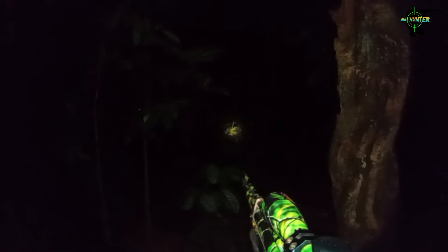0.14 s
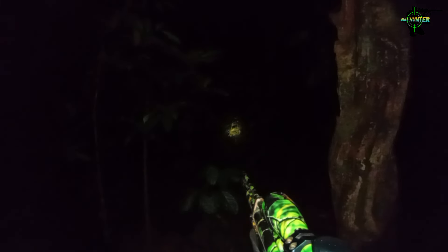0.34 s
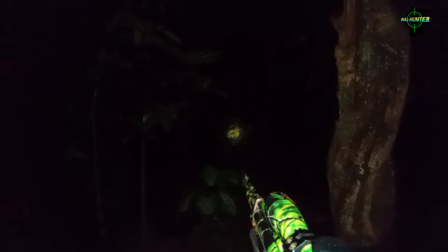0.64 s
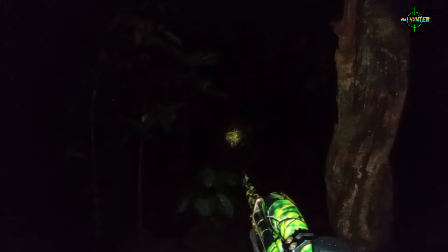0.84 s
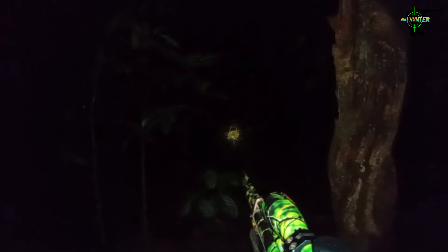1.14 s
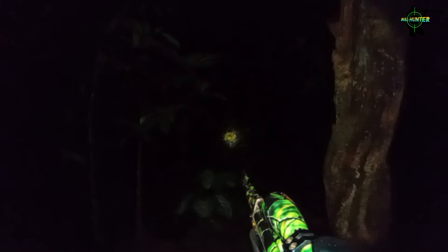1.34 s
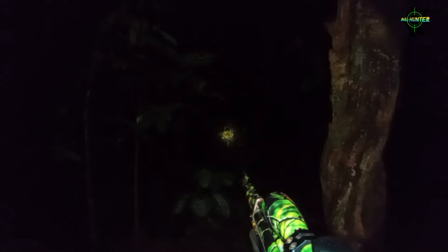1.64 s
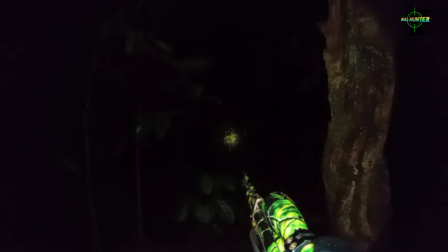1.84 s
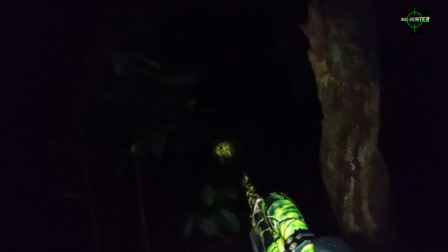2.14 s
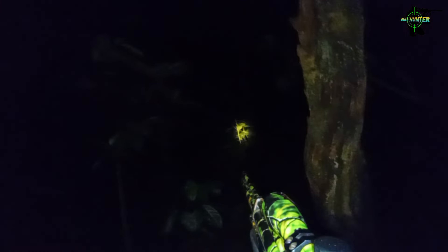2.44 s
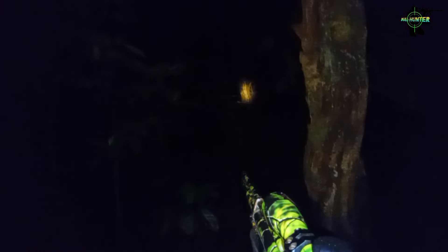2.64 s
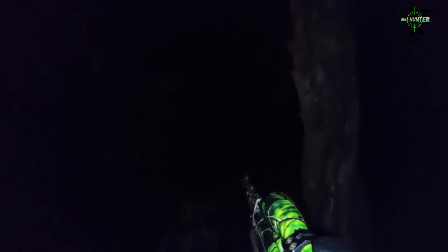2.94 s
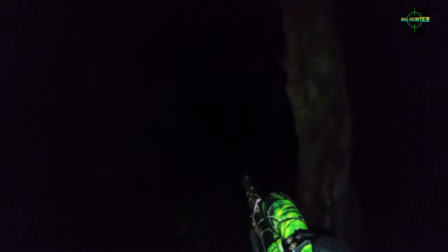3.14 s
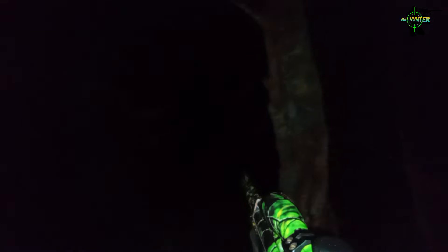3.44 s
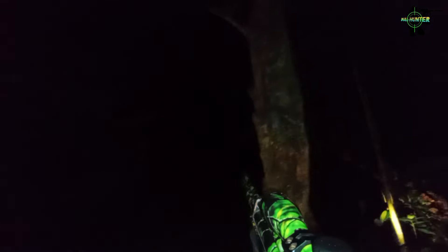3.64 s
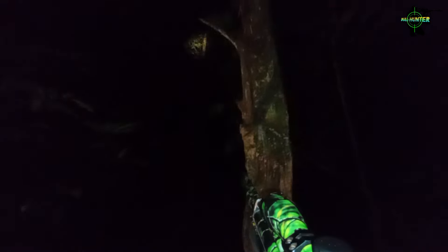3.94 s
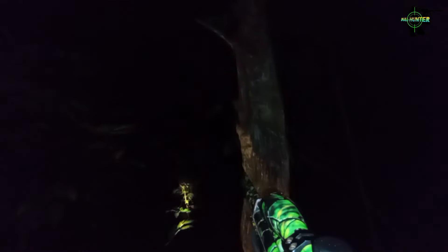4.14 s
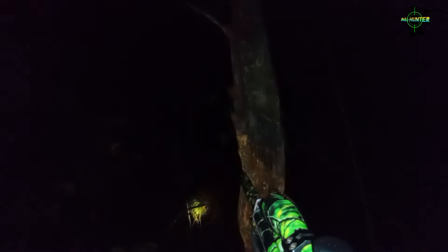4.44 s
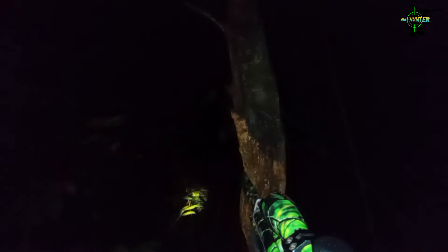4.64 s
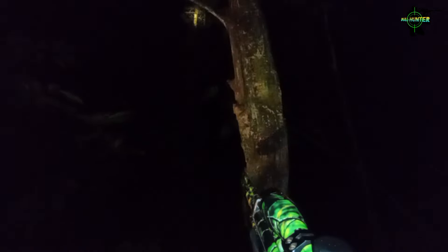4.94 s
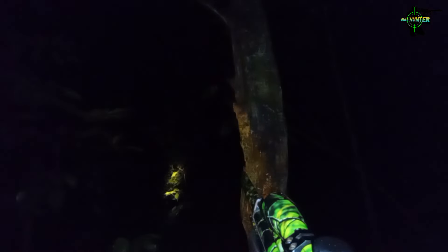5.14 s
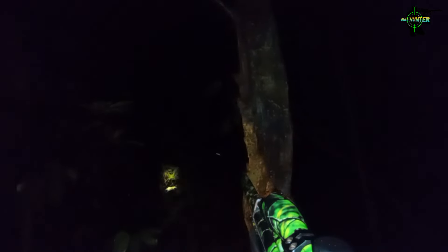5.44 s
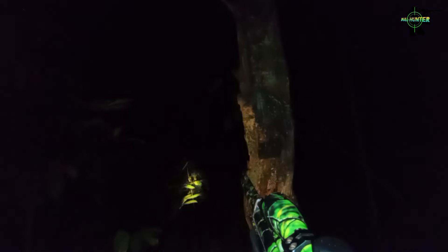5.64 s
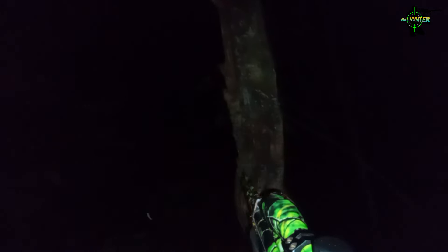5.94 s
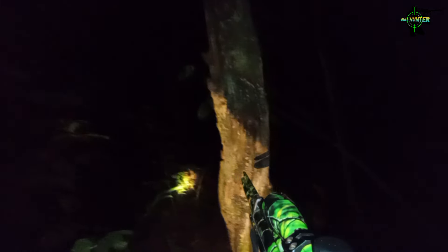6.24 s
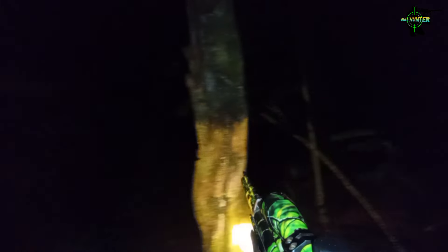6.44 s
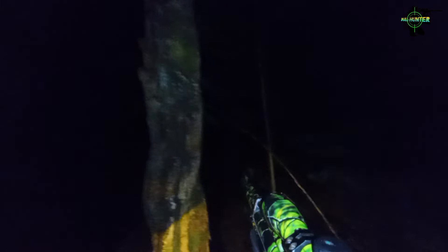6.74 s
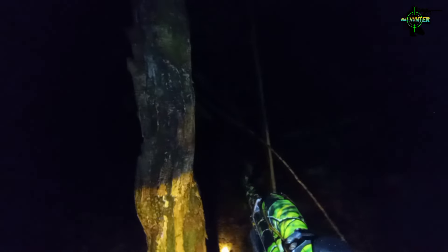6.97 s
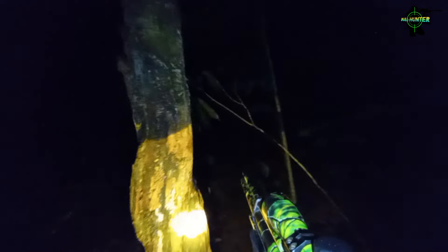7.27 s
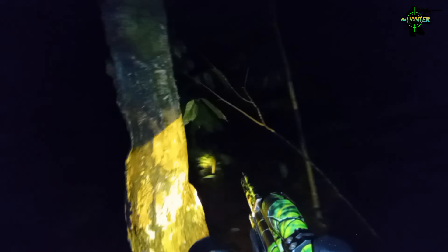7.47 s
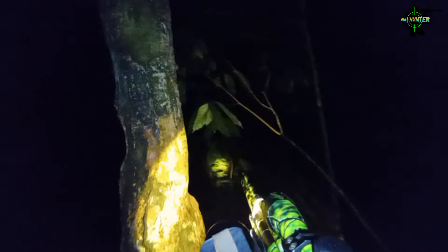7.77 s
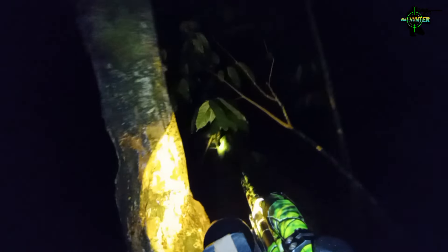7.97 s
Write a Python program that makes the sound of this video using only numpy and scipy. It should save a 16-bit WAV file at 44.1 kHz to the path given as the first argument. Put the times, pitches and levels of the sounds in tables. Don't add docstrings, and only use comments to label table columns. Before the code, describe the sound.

Dense high cricket trilling and rhythmic katydid buzzing fill a night forest while someone close by shifts on dry leaves, snapping a few sharp twigs.

```python
import sys
import numpy as np
from scipy import signal
from scipy.fft import rfft, irfft, next_fast_len
from scipy.io import wavfile
from scipy.ndimage import uniform_filter1d

SR = 44100
rng = np.random.default_rng(int(sys.argv[2]) if len(sys.argv) > 2 else 0)


def linear_from_db(decibels):
    return 10 ** (np.asarray(decibels, float) / 20)


def wav_record(signal):
    frames = np.transpose(np.atleast_2d(signal))
    bounded = np.clip(frames, -1, 1)
    quanta = np.round(bounded * 32767).astype(np.int16)
    wavfile.write(sys.argv[1], SR, quanta)


N = 357651
TIME = np.arange(N) / SR
SLOW = TIME[::50]


def unit(x):
    return x / np.sqrt(np.mean(x ** 2, axis=-1, keepdims=True))


def band(x, lo_hz, hi_hz, order=2):
    sos = signal.butter(order, [lo_hz, min(hi_hz, 0.45 * SR)], "band", fs=SR, output="sos")
    return signal.sosfilt(sos, x)


def sides(pan_db):
    return linear_from_db(np.array([pan_db, -pan_db]) / 2).reshape(2, -1)


def full(slow):
    return np.repeat(slow, 50, axis=-1)[..., :N]


def walk(rate):
    hold = int(441 / rate)
    held = rng.standard_normal(500)[np.arange(N // 100 + 1) // hold]
    smooth = uniform_filter1d(uniform_filter1d(held, hold), hold)
    return np.repeat(1.3 * smooth, 100)[:N]


def bouts(table, rest_db, bout_s):
    swells = sum(linear_from_db(db) * np.exp(-((SLOW - s) / bout_s) ** 2) for s, db in table)
    return full(linear_from_db(rest_db) + swells)


def coloured(points, channels=2):
    hz, db = np.transpose(points)
    n = next_fast_len(N, True)
    bin_hz = np.arange(n // 2 + 1) * SR / n
    gain = linear_from_db(np.interp(np.log(bin_hz + 1), np.log(hz), db))
    return unit(irfft(rfft(rng.standard_normal((channels, n))) * gain, n)[:, :N])


def grainy(points, per_s, scatter_db, smooth):
    sizes_db = np.clip(scatter_db * rng.exponential(size=N), 0, 16)
    grains = (rng.random(N) < per_s / SR) * linear_from_db(sizes_db)
    flicker = np.sqrt(np.abs(uniform_filter1d(grains ** 2, size=40)))
    return coloured(points) * (smooth + unit(flicker))


def trees(x, t60, direct_db):
    t = TIME[:SR // 3]
    echo = rng.standard_normal((2, len(t))) * np.exp(-np.log(1000) * t / t60)
    echo = echo / np.sqrt(np.sum(echo ** 2, axis=1, keepdims=True))
    echo[:, 0] = linear_from_db(direct_db)
    return signal.fftconvolve(np.float32(np.atleast_2d(x)), np.float32(echo), axes=1)[:, :N]


def singers(hz, spread_hz, strokes, glide=0.012, swell_db=1.0, wander=0.007, rise=0.18, count=3):
    out = 0
    for k in range(count):
        own = rng.standard_normal(2)
        tempo = strokes * (1 + 0.04 * own[0] + 0.05 * walk(8))
        stroke = np.float32((np.cumsum(tempo) / SR + k / count) % 1)
        place = 2 * (k + 0.5) / count - 1 + 0.2 * own[1]
        pitch = hz + spread_hz * place + hz * (wander * walk(5) - glide * (stroke - 0.35))
        gate = (stroke / rise * np.exp(1 - stroke / rise)) ** 2
        tone = np.sin(np.float32(2 * np.pi * (np.cumsum(pitch) / SR % 1)))
        out = out + full(linear_from_db(swell_db * walk(7)[::50])) * gate * tone
    return out


def crickets():
    # pitch in Hz, wing strokes per second.
    wings = [(4405, 54), (4495, 62), (4590, 66)]
    # end in seconds, level in dB, leading pitch in Hz, hush at the break in dB.
    phrases = [(.85, -54, 4570, 14), (1.65, -53, 4520, 6), (2.5, -52, 4466, 11.5), (3.35, -50.5, 4430, 20),
               (3.85, -53.5, 4464, -6.5), (4.4, -51.5, 4540, -4.5), (4.9, -54.5, 4485, 0),
               (5.85, -51, 4447, 13), (6.65, -51.5, 4440, 14.5), (7.65, -52.5, 4444, 0),
               (8.3, -51, 4460, 11)]
    # middle in seconds, level in dB.
    deep_bouts = [(.28, -64), (1.35, -65), (2.65, -65.5), (3.5, -65), (4.65, -61.5), (5.75, -62.5),
                  (6.65, -66), (7.55, -66)]
    swell_s, sag_hz, lead_width_hz = 0.12, 149, 52.7
    ends, levels, leads, hushes = np.transpose(phrases)
    k = np.clip(np.searchsorted(ends, TIME), 0, len(ends) - 1)
    starts = np.append(0, ends[:-1])[k]
    lead_hz = leads[k] + sag_hz * (0.5 - (TIME - starts) / (ends[k] - starts))
    phrase_db = levels[k] - hushes[k] * np.exp(-(TIME - starts) / swell_s)
    pair = singers(4200, 30, 96, glide=0.0079, wander=0.0035, count=2)
    out = bouts(deep_bouts, -71, 0.15) * unit(trees(pair, 0.1, -15.0))
    for hz, strokes in wings:
        db = uniform_filter1d(phrase_db - ((hz - lead_hz) / lead_width_hz) ** 2, size=4000)
        group = singers(hz, 25, strokes, glide=0.006, wander=0.0035, count=2)
        out = out + linear_from_db(db - 3.0) * unit(trees(group, 0.6, -9.5))
    return out


def choir():
    # middle in seconds, level in dB.
    upper_bouts = [(1.1, -62), (1.55, -86), (2.6, -61), (3.2, -55), (3.8, -58), (4.25, -54), (4.8, -53),
                   (5.2, -70), (5.6, -60), (7.2, -55), (7.72, -47)]
    throb = linear_from_db(2.7 * np.sin(2 * np.pi * np.cumsum(8.9 + 1.31 * walk(1.8)) / SR))
    crowd = singers(7905, 70, 58, glide=0.022, wander=0.009, rise=0.17, count=6)
    crowd = linear_from_db(-51.5) * throb * unit(trees(crowd, 0.63, -12.0))
    upper = unit(trees(singers(8330, 110, 80, glide=0.041, count=2), 0.25, -53.0))
    upper = linear_from_db(-12.0) * upper * bouts(upper_bouts, -71, 0.081)
    return (crowd + upper) * sides(-2.3)


def katydid():
    # first buzz in seconds, last buzz in seconds, level in dB.
    runs = [(-0.04, 1.63, -58), (1.865, 2.37, -57.5), (2.714, 2.95, -57.5), (3.208, 3.695, -58),
            (3.981, 4.689, -58.5), (4.964, 5.17, -58), (5.505, 5.966, -59), (6.261, 6.77, -58),
            (7.034, 7.278, -59), (7.673, 7.958, -58.5)]
    # pitch in Hz, width in Hz, level in dB.
    modes = [(10558, 385, 1.5), (10250, 170, -6), (9900, 400, -9.5), (10400, 69, -5.5), (13000, 8800, -26)]
    gap_s = 0.245
    starts, levels = [], []
    for first, last, db in runs:
        count = round((last - first) / gap_s) + 1
        starts.extend(np.linspace(first, last, count))
        levels.extend([db] * count)
    starts, levels = np.array(starts), np.array(levels)
    teeth = (rng.random(N) < 900 / SR) * linear_from_db(3.0 * rng.standard_normal(N))
    teeth = trees(teeth, 0.5, -12) * (1 + 0.25 * np.sin(2 * np.pi * 35 * TIME))
    buzz = np.searchsorted(starts - 0.017, TIME) - 1
    out = 0
    for k, (hz, width_hz, db) in enumerate(modes):
        peak_s = 0.065 - 0.0183 * (k % 4)
        age = np.float32(TIME - starts[buzz] + 0.013) / peak_s
        swell = linear_from_db(levels[buzz]) * np.abs(age * np.exp(1 - age)) ** 1.03
        scrape = unit(band(teeth, hz - width_hz / 2, hz + width_hz / 2))
        out = out + linear_from_db(db) * uniform_filter1d(swell, size=600) * scrape
    return out


def frog():
    # start in seconds, length in seconds, pitch in Hz, level in dB.
    calls = [(0.48, 0.17, 2904, -69), (1.75, 0.12, 2880, -64), (2.511, 0.11, 2910, -61.5),
             (3.641, 0.13, 2940, -65.5), (4.82, 0.26, 2823, -68), (5.519, 0.23, 2907, -69),
             (6.95, 0.2, 2910, -67), (7.817, 0.13, 2840, -68)]
    starts, lengths, pitches, levels = np.transpose(calls)
    call = np.clip(np.searchsorted(starts, TIME) - 1, 0, None)
    age = (TIME - starts[call]) / lengths[call]
    shape = np.clip(age / 0.04, 0, 1) * np.clip((1 - age) / 0.52, 0, 1)
    trill = singers(pitches[call], 20, 33, glide=0.0025, swell_db=2.0, wander=0.004, rise=0.18, count=3)
    return trees(linear_from_db(levels[call]) * shape * unit(trill), 0.59, -15.0)


def lone_cricket():
    # middle in seconds, level in dB.
    song_bouts = [(.66, -52), (1.42, -52.5), (2.2, -61), (3.17, -61), (3.98, -64), (4.75, -62.5),
                  (5.7, -69), (6.3, -61), (7.35, -55), (7.95, -58)]
    song = singers(4392, 0, 63, glide=0.004, wander=0.00111, rise=0.35, count=1)
    return bouts(song_bouts, -68, 0.18) * unit(trees(song, 0.28, -3.5))


def add(out, s, lo_hz, hi_hz, db, pan_db, tear_s, t60, alike=0.23):
    t = TIME[:3000]
    noise = rng.standard_normal((3, len(t)))
    noise[:, 0] = 3.56
    sag = t / 0.017 * (tear_s > 0)
    shape = np.exp(-sag - np.log(1000) * np.clip(t - tear_s, 0, 1) / t60)
    common = np.array([[alike], [abs(alike)]]) * noise[0]
    burst = band((common + (1 - abs(alike)) * noise[1:]) * shape, lo_hz, hi_hz)
    burst = burst / np.max(np.abs(burst), axis=1, keepdims=True)
    part = out[:, int(s * SR):int(s * SR) + len(t)]
    part += (linear_from_db(db) * sides(pan_db) * burst)[:, :part.shape[1]]


def twigs():
    # time in seconds, level in dB, brightness in dB per octave,
    # ringing pitch in Hz, left minus right in dB.
    snaps = [
        (0.9186, -25.5, 7, 9700, -11),
        (0.9207, -27, -0.5, 9000, 14),
        (3.491, -38.5, 2, 5700, 8),
        (6.0541, -39, -7, 4660, 13),
        (6.1753, -33, -4, 3570, 6),
    ]
    edges_hz = [1100, 3000, 6200, 9400, 11500, 16000]
    bands_db = [-18, 3, -3, 4, -21]
    # time in seconds, level in dB, pitch in Hz,
    # crackle over the body in dB, left minus right in dB.
    cracks = [(0.06, -25.5, 2220, -9, -1), (0.73, -39, 3100, -4, -4), (1.85, -43, 1270, 8.5, -5),
              (2.125, -44.5, 1390, 4, 0), (2.773, -65, 2390, 2, 2.5), (2.8, -48, 2300, 0, 5),
              (3.012, -54, 3710, 15.5, 5), (3.333, -42, 1330, 2, 9), (3.901, -43, 3920, -15, 2),
              (5.159, -54, 1810, 2, -7), (5.212, -43.5, 1630, -9, -2.5), (5.257, -40, 1840, 14, -1.5),
              (5.461, -52, 1056, -5, -4), (5.538, -44, 3700, 3, 3), (6.362, -58, 810, 2, -12),
              (7.282, -43.5, 3380, 1, -12), (7.339, -41, 2610, -4, -9), (7.364, -52, 3900, 1, -9),
              (7.746, -55, 1260, 3, -4), (7.978, -44, 1450, 1, -1)]
    # time in seconds, level in dB, pitch in Hz,
    # left minus right in dB.
    ticks = [(0.097, -42, 1110, 2), (0.665, -51.5, 1140, -4), (1.127, -41, 3160, 1), (1.153, -28, 1460, -7),
             (1.17, -37.5, 3460, -5), (1.229, -41.5, 2080, -2.5), (1.432, -46, 3300, -10),
             (1.453, -50.5, 1360, -2), (1.483, -34.5, 3060, 5), (1.633, -45, 1980, -2),
             (1.788, -43, 3770, 1), (1.802, -39, 3580, 18), (2.058, -49, 1410, 6), (2.172, -48, 1450, 9),
             (2.245, -49, 2240, 3), (2.334, -41.5, 1450, 3), (2.845, -44.5, 2400, 5), (3.208, -47, 1660, 1),
             (3.306, -47, 2190, 9), (3.787, -46, 2795, -1), (3.789, -47, 1260, -6), (3.848, -39.5, 1310, 6),
             (5.366, -49, 2280, -7), (6.886, -44, 3450, 13), (6.904, -44, 3780, 6), (7.855, -37, 2050, 8)]
    # time in seconds, level in dB, pitch in Hz, left minus right in dB.
    rings = [(0.918, -15, 10080, -10), (0.918, -34, 6600, 0), (0.9182, -17, 8400, -8),
             (0.9186, -32, 3850, -2), (0.919, -37.5, 1040, -1), (0.9205, -25, 9300, -5),
             (0.9215, -46, 750, 1), (3.49, -48, 1780, 7), (6.0535, -38, 5030, 8), (6.0554, -46.5, 2840, 9),
             (6.0536, -50, 1360, 4), (6.175, -28.5, 3720, 12), (6.175, -29, 5300, 14),
             (6.175, -26.5, 7300, 8), (6.177, -43, 1990, 3)]
    tear_s = 0.00071
    out = np.zeros((2, N))
    for s, db, bright_db, ring_hz, pan in snaps:
        add(out, s, 1.01 * ring_hz, 1.1 * ring_hz, db - 12.5, pan, tear_s, 0.008)
        for k, (lo, hi, band_db) in enumerate(zip(edges_hz, edges_hz[1:], bands_db)):
            level_db = db + 4.5 + band_db + bright_db * np.log2(hi / edges_hz[2])
            add(out, s, lo, hi, level_db, pan * (1 + 0.11 * k), tear_s, 0.007)
    dull = [(s, db, hz, -28, pan) for s, db, hz, pan in ticks]
    for s, db, hz, crackle_db, pan in cracks + dull:
        add(out, s, 0.74 * hz, 1.16 * hz, db - 8.5, pan, 0, 0.025 + 14 / hz)
        add(out, s, 0.37 * hz, 2.02 * hz, db - 5, pan, 0, 0.012)
        add(out, s, 4000, 9000, db + crackle_db, 0.91 * pan, 0, 0.012)
        add(out, s, 9000, 16000, db + crackle_db - 16, 1.5 * pan, 0, 0.008)
    for s, db, hz, pan in rings:
        add(out, s, 0.905 * hz, 1.056 * hz, db, pan, 0, 0.0027 + 4.9 / hz)
    return out + linear_from_db(-18.5) * trees(out, 0.12, -60)


def crumbs():
    # time in seconds, level in dB, pitch in Hz, left minus right in dB.
    bits = [(0.047, -39, 1970, 11), (0.067, -43.5, 1740, -22), (0.715, -51.5, 3120, 3.0),
            (1.059, -63, 2390, 0.5), (1.111, -52, 3250, -3), (1.162, -46, 746, -5),
            (1.176, -44, 2290, -1.5), (1.182, -53, 3540, -1.5), (1.236, -66, 703, 0),
            (1.264, -53, 2320, -12), (1.281, -49, 2240, -2), (1.349, -49, 3460, -2.0),
            (1.364, -49, 1110, -10), (1.483, -37.5, 3150, -17), (1.609, -59, 2200, -3.5),
            (1.747, -53, 1250, -1.5), (1.81, -31.5, 3570, 1), (1.85, -41, 1290, 0), (1.871, -40, 2950, -3),
            (1.941, -57, 2260, 7), (2.114, -59, 724, -7), (2.136, -49, 1430, -2), (2.164, -54, 1110, 4.5),
            (2.185, -53, 703, 6), (2.192, -45, 1380, 3), (2.226, -49, 711, -4), (2.28, -51.5, 890, 10),
            (3.516, -50, 2310, 1.0), (6.06, -40.5, 3130, -3), (6.182, -42, 3300, -10),
            (7.594, -54, 1060, 12), (0.074, -51, 1200, 0), (1.166, -45, 1900, -2), (1.645, -48, 1200, 2),
            (3.345, -52, 1800, 2), (7.342, -47, 1000, -5), (7.868, -49, 1500, 2), (7.63, -52, 2000, 0),
            (7.982, -53, 800, -7)]
    # time in seconds, level in dB, left minus right in dB.
    flecks = [(1.8113, -60, 4.0), (2.1246, -54, 5.0), (2.2468, -59, 11), (2.6614, -59, 6.0),
              (2.7247, -60, 6.0), (2.7554, -59, 4.5), (2.7741, -54, 6.5), (2.8015, -48, 7.0),
              (2.8499, -55, 9.5), (2.9394, -44, 11), (5.1587, -45, -1.5), (5.3647, -61, -2.5),
              (5.6002, -64, 0.0), (5.6775, -60, 0.0), (5.8441, -65, -2.0), (6.3614, -49, -3.5),
              (6.4572, -55, -1.5), (7.2719, -46, -3), (7.3647, -55, -5.5), (7.865, -54, -1.0),
              (1.8498, -53, -2), (7.7465, -55, 1), (7.282, -41, -8)]
    out = np.zeros((2, N))
    for s, db, hz, pan in bits:
        add(out, s, 0.87 * hz, 1.19 * hz, db - 9.0, pan, 0, 0.025 + 12 / hz)
        add(out, s, 0.5 * hz, 2.1 * hz, db - 7.0, pan, 0, 0.015)
    for s, db, pan in flecks:
        add(out, s, 7000, 16000, db + 9.0, pan, 0, 0.008)
    return out + linear_from_db(-5.0) * trees(out, 0.063, -60)


def knocks():
    # time in seconds, level in dB, pitch in Hz, left minus right in dB.
    blows = [(0.064, -43, 470, -3), (0.918, -35, 870, -1), (0.921, -50, 423, -4), (1.125, -38.5, 150, -6),
             (1.16, -35, 285, -1.5), (1.642, -45, 294, 1.5), (2.11, -42, 200, 1), (2.128, -48.5, 130, 10),
             (2.143, -42.5, 106, 8), (2.162, -42, 200, 0), (2.185, -55.5, 400, 5), (2.277, -43, 465, 2),
             (2.28, -63, 880, 4), (3.288, -58, 256, -10), (7.233, -36.5, 400, 3), (7.571, -41.5, 550, 8),
             (7.595, -56, 700, 0), (7.873, -42.5, 176, -8), (7.858, -52.5, 597, 6), (7.595, -55, 400, 0),
             (7.891, -49, 258, -6), (3.491, -54.5, 590, 3), (3.855, -53, 705, 2)]
    out = np.zeros((2, N))
    for s, db, hz, pan in blows:
        alike = 0.38 if hz > 350 else -0.58
        add(out, s, 0.53 * hz, 1.32 * hz, db + 2.5, pan, 0, 0.0088 + 11.7 / hz, alike)
    return out


def rustle():
    # start in seconds, hold in seconds, leaf level in dB,
    # cloth level in dB, left minus right in dB.
    moves = [(-0.001, 0.028, -83, -78, 6), (0.325, 0.11, -92, -73.5, -2), (0.906, 0.076, -76, -95, 6),
             (1.134, 0.029, -79, -65, -1), (1.237, 0.18, -81, -75.5, 1), (2.114, 0.096, -75, -73, -1),
             (2.684, 0.16, -88, -83.5, 14), (2.86, 0.2, -65.5, -86, 6), (3.1, 0.037, -95, -75, 3),
             (3.9, 0.3, -83, -77, 3), (4.498, 0.19, -95, -83, 11), (5.17, 0.11, -68.5, -64.5, 0),
             (5.328, 0.22, -80.5, -80, -2), (5.523, 0.23, -82, -73.5, 7), (6.312, 0.1, -74.5, -69, 0),
             (6.557, 0.54, -93, -79.5, 1), (7.237, 0.07, -79, -88, -10), (7.347, 0.22, -70, -64, -1),
             (7.705, 0.24, -88, -87, 3)]
    # pitch in Hz, level in dB.
    leaf_colour = [(1500, -14), (3000, -6), (5500, -4.5), (8500, 2), (10500, 6), (13000, -8.5),
                   (15500, -11), (16500, -37)]
    # pitch in Hz, level in dB.
    cloth_colour = [(300, 9.5), (600, 9), (1200, -3), (2200, -2.5), (4000, -5), (7000, -40)]
    rise_db_s, fall_db_s = 196, 124
    leaf, cloth = linear_from_db(-85.5), linear_from_db(-75)
    for s, hold, leaf_db, cloth_db, pan in moves:
        drop_db = np.maximum(rise_db_s * (s - SLOW), fall_db_s * (SLOW - s - hold)).clip(0)
        shape = linear_from_db(-drop_db) * sides(pan)
        leaf = leaf + linear_from_db(leaf_db) * shape
        cloth = cloth + linear_from_db(cloth_db) * shape
    hiss = grainy(leaf_colour, 700, 2.7, 1.0)
    crackle = grainy(cloth_colour, 400, 2.1, 1.0)
    hiss = hiss / np.std(band(hiss, 11500, 15500, order=4))
    crackle = crackle / np.std(band(crackle, 800, 2000, order=4))
    hiss = hiss * full(leaf) * linear_from_db(1.0 * walk(12) + 1.6 * walk(45))
    return hiss + crackle * full(cloth) * linear_from_db(4.8 * walk(14) - 9.5)


def puffs():
    # middle in seconds, level in dB.
    gusts = [
        (.4, -67),
        (3.29, -68.5),
        (4.6, -70.5),
        (5.8, -63.5),
        (6.4, -75),
        (7.1, -81),
    ]
    noise = coloured([(200, -20), (320, 4.5), (550, 5), (800, -25)])
    return bouts(gusts, -94.5, 0.1) * linear_from_db(3.5 * walk(25)) * noise


def far_singers():
    # pitch in Hz, spread in Hz, wing strokes per second, level in dB.
    far = [(2320, 130, 54, -75.5), (5040, 130, 65, -75.5), (6380, 180, 64, -81), (6950, 55, 73, -86),
           (8750, 180, 63, -75.5)]
    out = 0
    for hz, spread_hz, strokes, db in far:
        song = singers(hz, spread_hz, strokes, swell_db=1.0, wander=0.01, count=2)
        out = out + linear_from_db(db) * unit(trees(song, 0.99, -31.0))
    return out


def motor():
    # multiple of the turning rate, level in dB.
    orders = [(3, -19), (4, -3.5), (5, -2.5), (6, -8.5)]
    turn = 2 * np.pi * np.cumsum(29.87 * (1 + 0.02936 * walk(6.5))) / SR
    drone = sum(linear_from_db(db + 1.1 * walk(5.3)) * np.sin(k * turn) for k, db in orders)
    fade_db = 60 * np.clip(TIME - 1.3, 0, 0.3)
    return linear_from_db(-63.5 - fade_db) * unit(trees(drone, 0.21, 1.8))


def air():
    # time in seconds, level in dB.
    breeze = [(0.0, -67.5), (1.15, -71), (1.35, -66.5), (1.96, -71), (2.21, -67), (2.82, -73),
              (3.34, -66.5), (4.13, -71.5), (4.61, -67), (4.83, -75.5), (5.64, -69), (6.14, -72.5),
              (6.39, -65), (6.84, -73), (7.61, -68.5), (8.11, -71)]
    # pitch in Hz, level in dB.
    hiss_colour = [(600, -2), (900, -2.5), (2000, -4), (4000, -2), (5500, -11.5), (7000, 8), (9500, 1),
                   (11500, -19), (16000, -40)]
    deep_colour = [(25, -22), (50, -0.5), (100, 7.5), (140, 7), (200, 0.5), (300, -24.5)]
    low_colour = [(140, -7.5), (200, -4.5), (280, 4), (400, -6), (540, -6), (700, -26), (1000, -55)]
    share, right_late = 0.46, 8
    breeze_s, levels = np.transpose(breeze)
    breeze_db = np.interp(TIME, breeze_s, levels)
    deep_db = -67 + 0.12 * (breeze_db - breeze_db.mean())
    layers = [(hiss_colour, -68 + 0.15 * walk(7.0)),
              (deep_colour, deep_db + 0.97 * walk(14)),
              (low_colour, breeze_db + 3.5 + 0.97 * walk(13))]
    out = 0
    for points, db in layers:
        noise = coloured(points, channels=3)
        shared = np.array([noise[0], np.roll(noise[0], right_late)])
        out = out + linear_from_db(db) * (np.sqrt(share) * shared + np.sqrt(1 - share) * noise[1:])
    return out


def scene():
    animals = crickets() + choir() + katydid() + frog() + lone_cricket()
    walker = twigs() + crumbs() + knocks() + rustle() + puffs()
    return animals + walker + far_singers() + motor() + air()


def low_pass(x):
    return signal.sosfilt(signal.butter(12, 15850, fs=SR, output="sos"), x)


def record(dry):
    mix = signal.sosfilt(signal.butter(2, 70, "high", fs=SR, output="sos"), dry)
    ceiling = 0.62
    mix = ceiling * np.tanh(mix / ceiling)
    return low_pass(mix)


dry = scene()
out = record(dry)
wav_record(out)
```